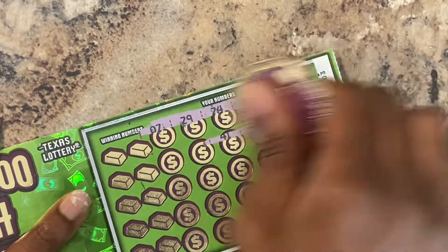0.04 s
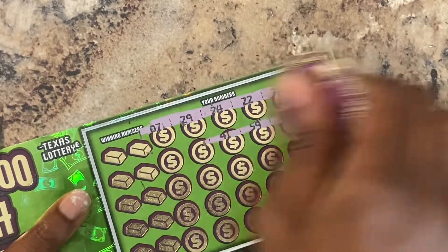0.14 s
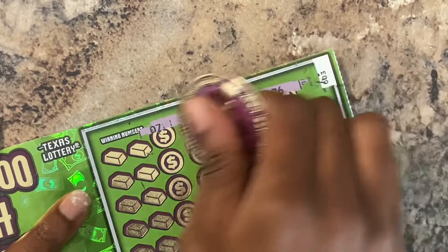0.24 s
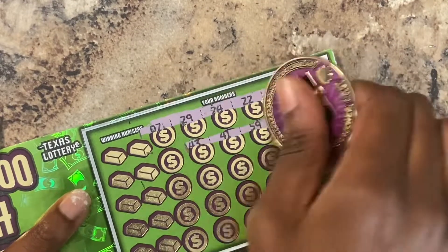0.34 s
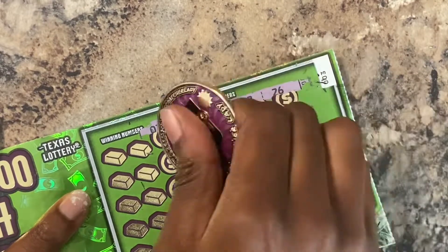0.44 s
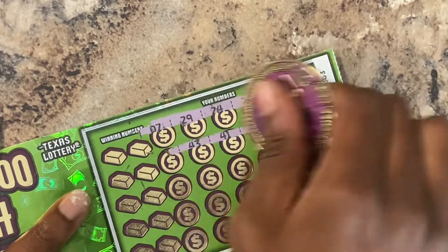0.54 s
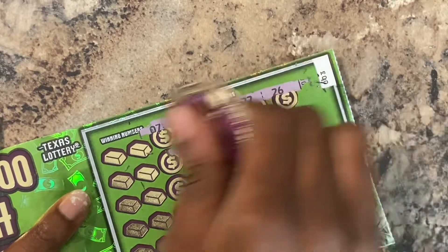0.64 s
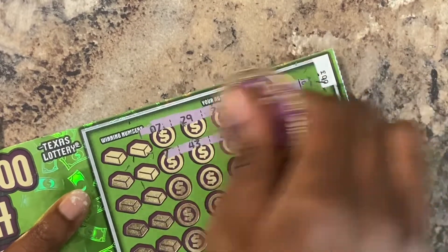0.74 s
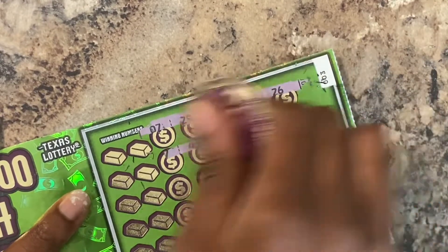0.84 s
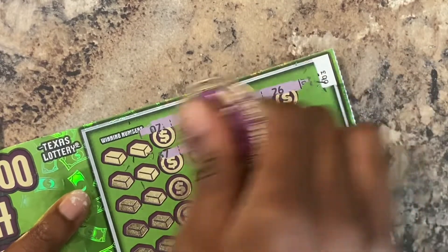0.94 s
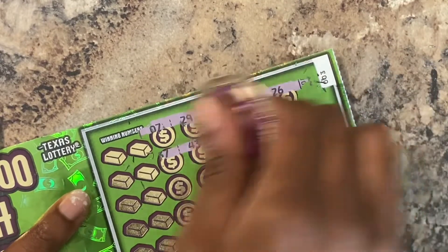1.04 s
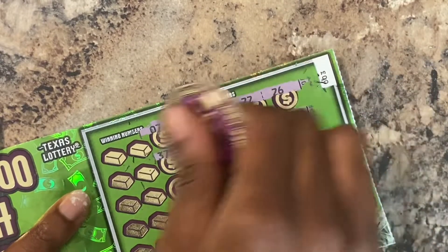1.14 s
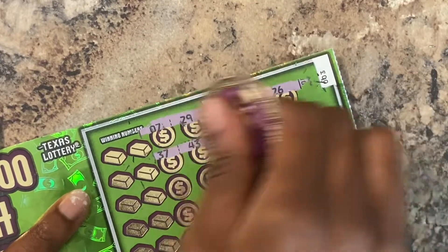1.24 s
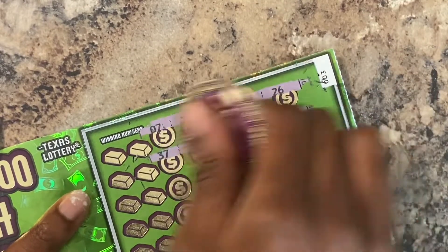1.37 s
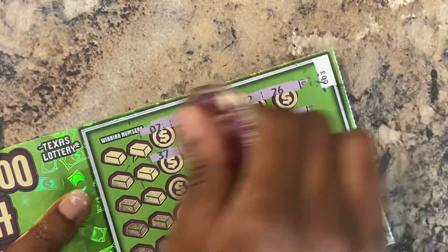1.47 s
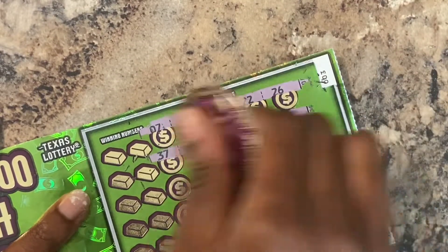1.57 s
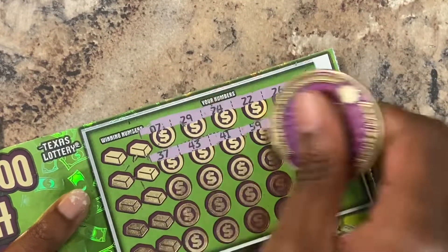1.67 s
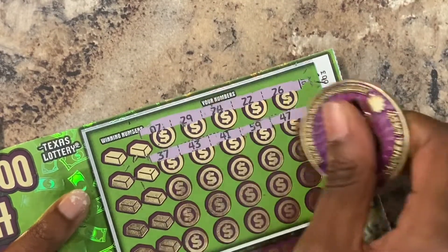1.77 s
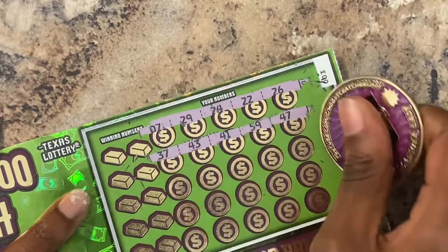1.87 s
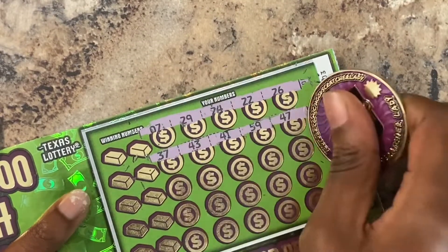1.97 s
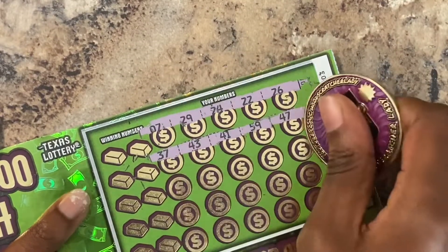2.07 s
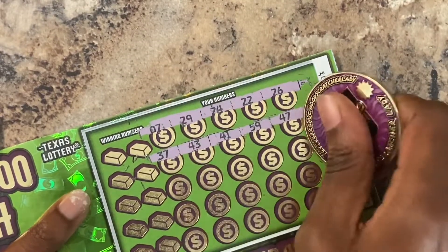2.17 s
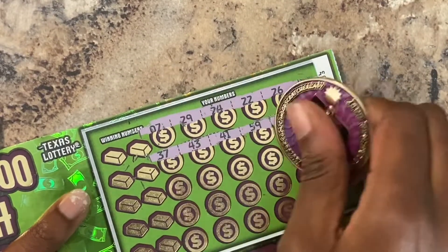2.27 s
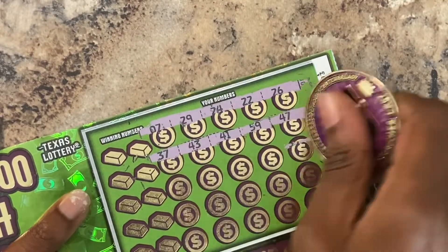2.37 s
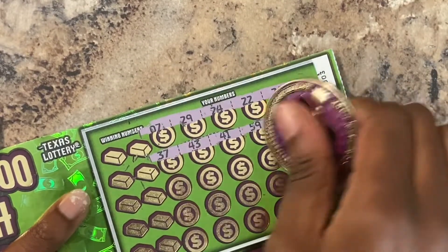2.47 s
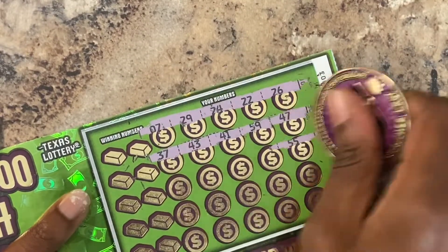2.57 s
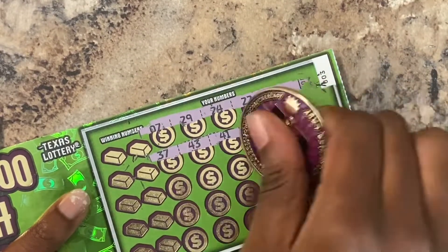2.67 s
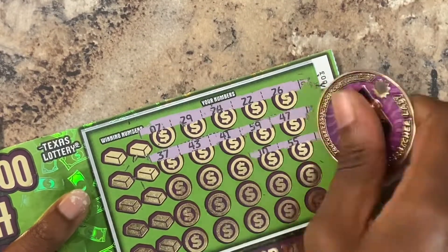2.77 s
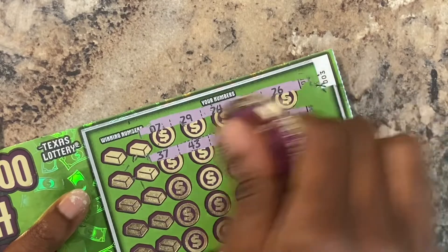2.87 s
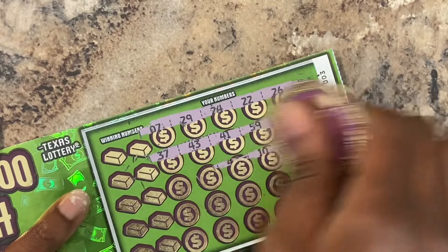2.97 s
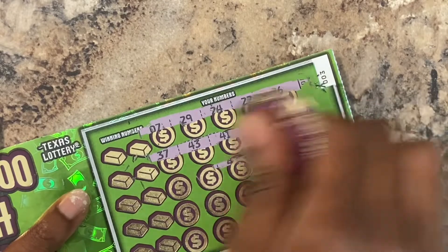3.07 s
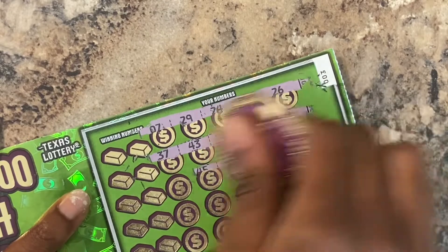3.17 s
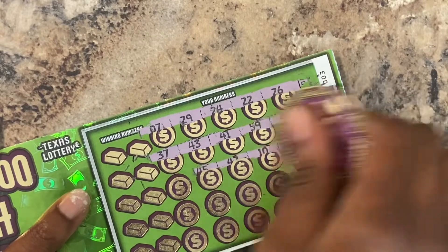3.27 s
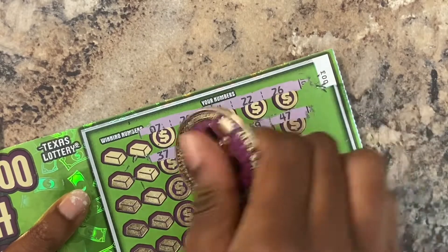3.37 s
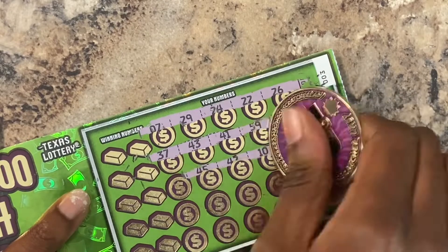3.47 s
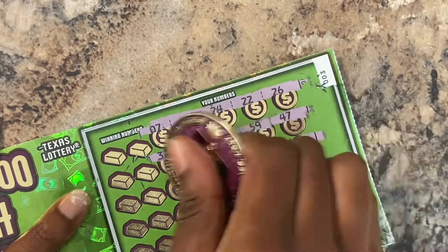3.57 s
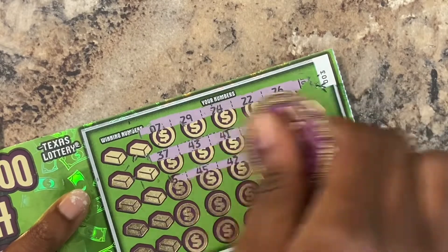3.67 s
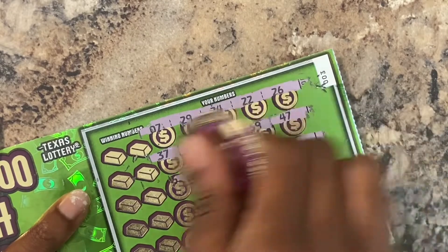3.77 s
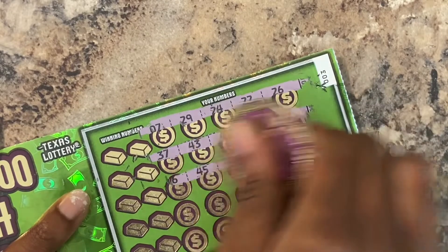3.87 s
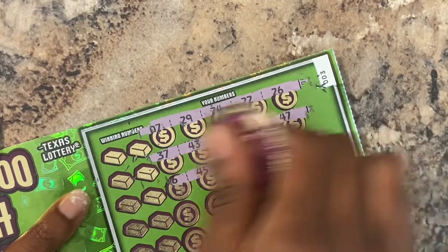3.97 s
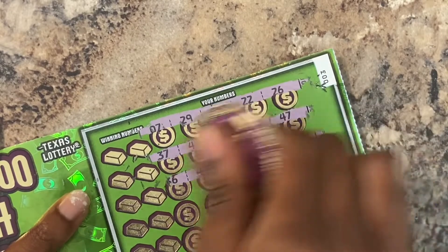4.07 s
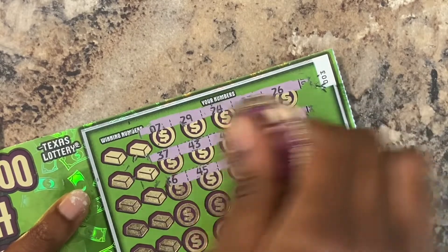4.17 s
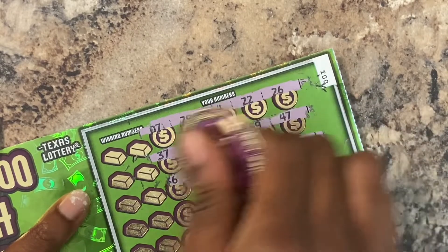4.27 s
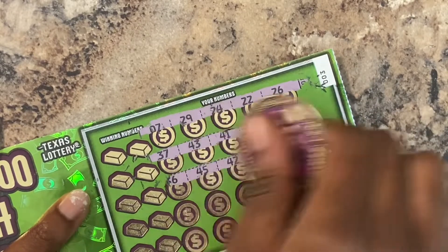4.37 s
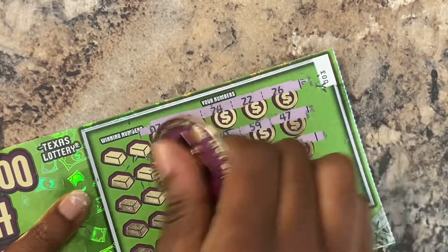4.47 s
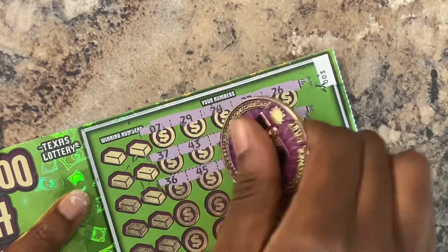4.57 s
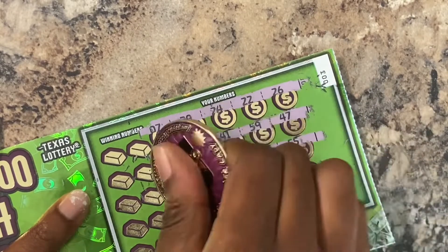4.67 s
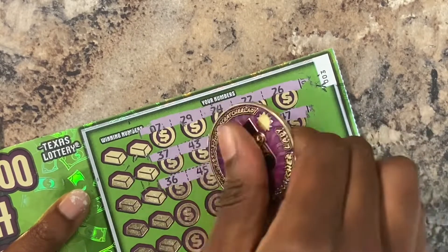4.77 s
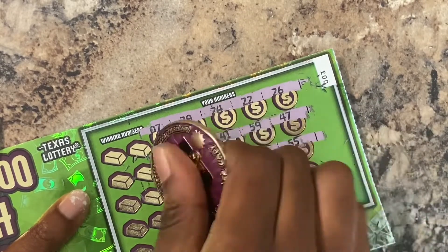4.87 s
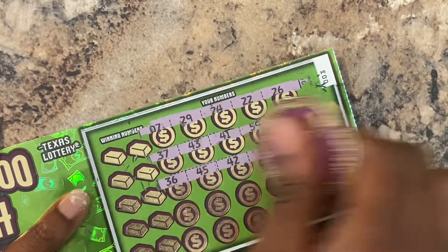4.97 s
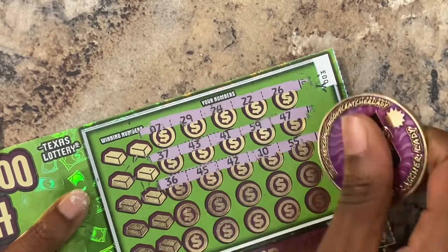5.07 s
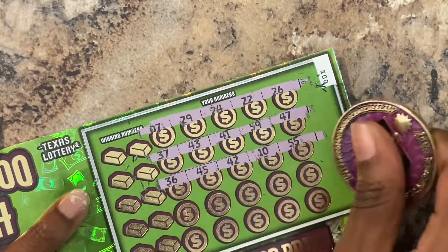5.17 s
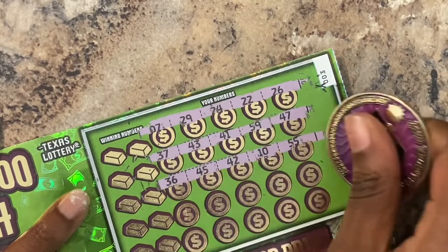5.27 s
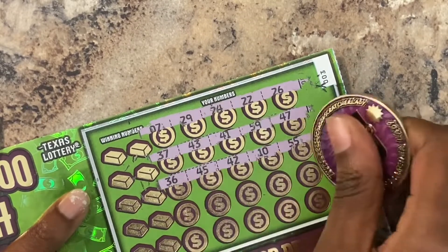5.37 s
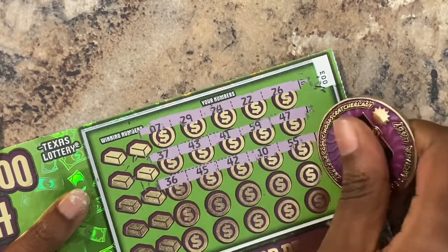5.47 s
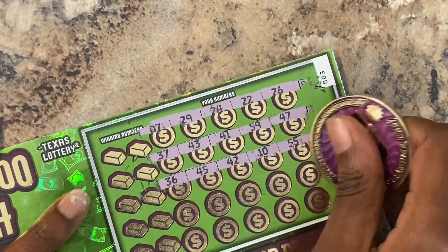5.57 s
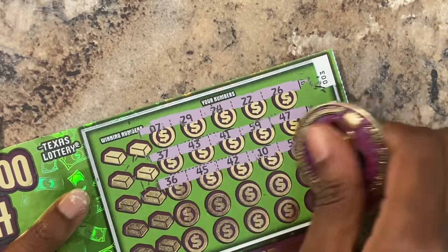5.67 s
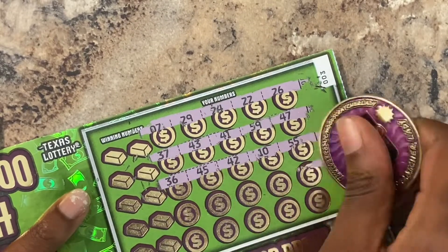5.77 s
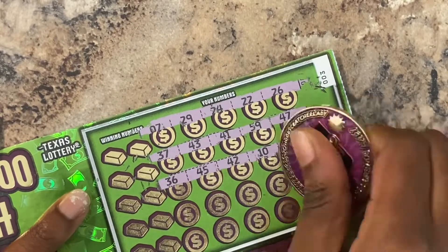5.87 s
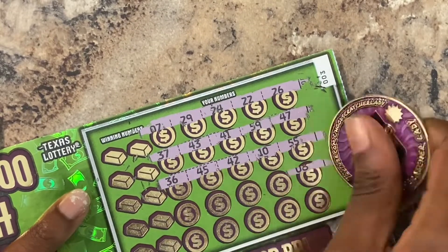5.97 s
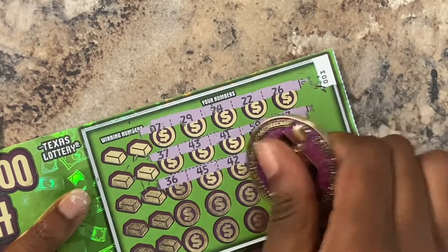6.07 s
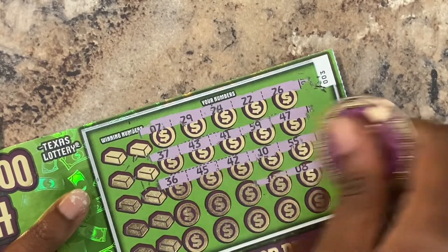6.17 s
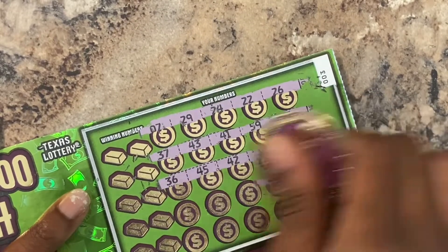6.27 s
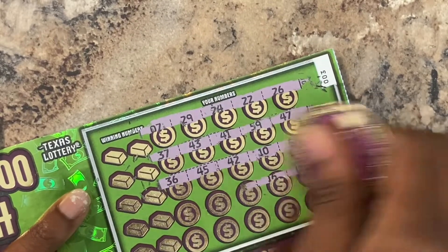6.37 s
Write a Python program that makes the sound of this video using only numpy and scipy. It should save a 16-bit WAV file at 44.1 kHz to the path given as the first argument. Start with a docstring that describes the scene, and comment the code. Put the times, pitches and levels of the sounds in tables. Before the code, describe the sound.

Close up, a large coin scratches the coating from a paper ticket on a stone countertop. About nine quick strokes a second alternate heavy and light, gritty crackle over a hollow papery thrum. Three bouts are split by short pauses with a small tap as the coin is set down. A faint low hum and quiet room noise lie beneath; close stereo microphone, little echo.

```python
"""Brisk, crackling scrapes: a large coin rubs the coating off a paper ticket on a stone countertop.
About nine strokes a second run in three bouts, heavy forward and light back. Dense tiny fractures make
the crackle; the rim's slips and catches set the pressed coin and card thrumming, and its drag over the fibres rasps.
Between bouts the coin is set down with a tap, a bending wave whose high notes arrive first.
Sine tones hum faintly over filtered room noise; two close microphone ports hear it all."""
import sys
import numpy as np
from scipy import signal
from scipy.fft import rfft, irfft, next_fast_len
from scipy.io import wavfile
from scipy.ndimage import uniform_filter1d, map_coordinates

SR = 44100
rng = np.random.default_rng(int(sys.argv[2]) if len(sys.argv) > 2 else 0)


def materialize(psi):
    """Save the field psi as 16-bit PCM at rate SR to the path in sys.argv[1].

    A 1-D psi becomes a single channel; in a 2-D psi each row is a channel.
    """
    bounded = np.clip(np.atleast_2d(psi).T, -1, 1)
    quanta = np.round(bounded * 32767).astype(np.int16)
    wavfile.write(sys.argv[1], SR, quanta)


N = 283563


def amp(db):
    """Decibels to gain."""
    return 10 ** (np.asarray(db) / 20)


def unit(x):
    """Scale to rms 1."""
    return x / np.sqrt(np.mean(x ** 2) + 1e-20)


def along(points, hz):
    """Read (f/Hz, value) points on a log frequency axis."""
    f, v = np.transpose(points)
    return np.interp(np.log(hz + 1), np.log(f + 1), v)


def wobble(rate):
    """A smooth random curve, rate knots a second."""
    return map_coordinates(rng.standard_normal(SR), [np.arange(N) * rate / SR])


def filtered(x, response):
    """Multiply the spectrum of x by a complex response of frequency."""
    size = next_fast_len(N + SR // 2)
    return irfft(rfft(x, size) * response(np.fft.rfftfreq(size, 1 / SR)), size)[..., :N]


def ring(level_db, size=4096):
    """Causal (minimum-phase) impulse response, of energy 1, with the given dB response."""
    cepstrum = irfft(np.log(amp(level_db(np.fft.rfftfreq(size, 1 / SR))) + 1e-6))
    # fold the cepstrum forward in time so that the response is causal
    cepstrum[1:size // 2] *= 2
    cepstrum[size // 2 + 1:] = 0
    response = irfft(np.exp(rfft(cepstrum)))
    return response / np.linalg.norm(response)


def through(x, response):
    """Excite an impulse response with x."""
    return signal.fftconvolve(x, response)[:N]


def add(track, s, sound):
    """Mix a sound into the track at time s, in seconds."""
    part = track[max(round(s * SR), 0):][:len(sound)]
    part += sound[:len(part)]


def slips(rate, spread_db):
    """Tiny random slips, rate a second, of uneven size and either sign, rms 1."""
    sizes = amp(spread_db * np.clip(rng.standard_normal(N), -2, 2))
    signs = np.sign(rng.standard_normal(N))
    happens = rng.random(N) < rate / SR
    return unit(sizes * signs * happens)


def patchy(x, depth_db, size=256):
    """Random gains over patches of time and frequency."""
    z = signal.stft(x, nperseg=size)[2]
    across_hz = uniform_filter1d(rng.standard_normal(z.shape), size=5, axis=0)
    field = uniform_filter1d(across_hz, size=7, axis=1)
    return signal.istft(z * amp(depth_db * unit(field)), nperseg=size)[1][:N]


# colour of the room noise: (f/Hz, relative level/dB per Hz)
ROOM_NOISE_COLOUR = [(20, -37), (45, -11), (70, 5.5), (100, 2.5), (170, -1), (330, -1.5), (450, -15.5),
                     (570, -12.5), (800, -27), (1200, -32.5), (3000, -37), (6500, -43.5), (12000, -47),
                     (16000, -62)]


def air(air_db=-57):
    """Low, steady room noise: random pressure shaped by a fixed spectrum."""
    return amp(air_db) * unit(filtered(rng.standard_normal(N), lambda hz: amp(along(ROOM_NOISE_COLOUR, hz))))


# steady tones of the room: (f/Hz, rms level/dB, wander/Hz)
HUM_TONES = [(119, -64, 0.843), (239.6, -73, 2.7), (530, -80.5, 7.4), (3780, -89.5, 25), (4500, -84, 120)]


def hum():
    """An appliance's hum and thin whine: sines whose pitch wanders slightly."""
    out = np.zeros(N)
    for hz, db, wander in HUM_TONES:
        phase = 2 * np.pi * np.cumsum(hz + wander * wobble(4 * wander)) / SR
        out += amp(db) * np.sqrt(2) * np.sin(phase)
    return out


# how long the walls ring: (f/Hz, t60/s)
WALL_DECAY = [(200, 0.37), (600, 0.47), (4000, 0.34), (15000, 0.08)]


def room(x):
    """The walls answer with a diffuse tail, each frequency dying at its own speed."""
    hz, t, z = signal.stft(rng.standard_normal(SR // 2), SR, nperseg=256)
    fade_db = -60 * t / along(WALL_DECAY, hz)[:, None]
    tail = signal.istft(z * amp(fade_db), SR, nperseg=256)[1]
    # the tail starts 5 ms late
    return through(x, np.pad(unit(tail) / np.sqrt(len(tail)), (SR // 200, 0)))


# phase by which the left port leads: (f/Hz, phase/rad)
LEFT_LEAD = [(100, 0), (430, -.6), (700, -.25), (900, -.1), (1150, .35), (1800, 0), (7500, 0), (7950, -1.4),
             (8850, -3.05), (9550, -3.25), (10500, -5.7), (11050, -6.28), (11650, -6.3), (12450, -8.7),
             (13350, -9.45), (15050, -12.57)]
# left-right likeness: (f/Hz, correlation 0-1)
LIKENESS = [(100, .97), (600, .98), (1000, .88), (2000, .95), (2600, .995), (7400, .98), (7750, .65),
            (9100, .99), (9950, .65), (11200, .98), (12200, .6), (13200, .99), (14300, .8), (15500, .97)]
# left minus right: (f/Hz, level/dB)
LEFT_EXCESS = [(700, 0), (1000, -4), (1400, -4), (1800, 0)]


def ports(common, differing):
    """Two ports share one sound, offset in phase and level, plus a part of opposite sign in each."""
    sides = np.array([[1], [-1]])  # left, right

    def turn(hz):
        return np.arccos(np.clip(along(LIKENESS, hz), 0, 1)) / 2

    def offset(hz):
        level = amp(.5 * sides * along(LEFT_EXCESS, hz))
        return level * np.exp(.5j * sides * along(LEFT_LEAD, hz))

    shared = filtered(common, lambda hz: np.cos(turn(hz)))
    opposed = sides * filtered(differing, lambda hz: np.sin(turn(hz)))
    return filtered(shared + opposed, offset)


# the rim grazes the card as it leaves and before it lands: (start t/s, length/s, level/dB)
GRAZES = [(1.555, .1, -75), (4.905, .08, -77), (5.36, 0.12, -73)]


def brush(fade_s=0.02):
    """A faint hiss as the rim grazes the card: noise in a broad hump around 6.5 kHz."""
    t = np.arange(N) / SR
    gain = np.zeros(N)
    for s, length, db in GRAZES:
        to_edge = np.minimum(t - s, s + length - t)
        gain += amp(db) * np.clip(to_edge / fade_s, 0, 1)
    hiss = filtered(rng.standard_normal(N), lambda hz: np.exp(-((hz - 6500) / 4000) ** 2))
    return gain * unit(hiss)


# light ticks of the rim as it lifts or touches: (t/s, relative level/dB)
RIM_TICKS = [(1.546, -28), (2.006, -43), (2.027, -43), (2.031, -39), (4.886, -26.5), (5.354, -43)]


def ticks(t60=0.0083, tick_db=-7, dull_share=0.28):
    """Short clicks of the rim: dying noise, coloured between its scrape and its bite."""
    t = np.arange(SR // 20) / SR
    out = np.zeros(N)
    for s, db in RIM_TICKS:
        add(out, s, amp(db + tick_db - 60 * t / t60) * rng.standard_normal(len(t)))

    def colour(hz):
        return (1 - dull_share) * along(COATING_COLOUR, hz) + dull_share * along(BITE_COLOUR, hz)

    return through(out, ring(colour))


# the coin is set down: (t/s, knock level/dB)
SET_DOWNS = [(2.026, -22.5), (5.445, -27.5)]


def taps(body_share=0.52, dull_hz=900, lead_s=0.0041, settle_db=-22, settle_t60=0.044, size=4096):
    """A tap spreads as a bending wave, high notes first; the card then settles under the coin."""
    hz = np.fft.rfftfreq(size, 1 / SR)
    # the delay is 12 ms at 550 Hz and falls with the root of frequency
    phase = 4 * np.pi * .012 * np.sqrt(550 * hz)
    body = amp(body_share * along(HEAVY_THRUM, hz)) / (1 + (hz / dull_hz) ** 4)
    knock = irfft(body * np.exp(-1j * phase))
    settle_fade = amp(settle_db - 60 * np.arange(size) / SR / settle_t60)
    settling = settle_fade * rng.standard_normal(size)
    settled = np.convolve(settling, knock / np.linalg.norm(knock))[:size]
    thud = knock / np.abs(knock).max() + settled
    out = np.zeros(N)
    for s, db in SET_DOWNS:
        add(out, s - lead_s, amp(db) * thud)
    return out


# strokes, alternately back and forth, beginning with a back stroke:
# (start t/s, force as relative thrum level/dB, scrape level/dB, rise of the scrape along the stroke/dB)
STROKE_PLAN = [(-0.03, -29, -47, 12), (0.086, -23, -41, 9), (0.211, -34, -48, -1), (0.32, -23, -44.5, -1),
               (0.434, -33, -48, -3.5), (0.542, -26.5, -46, 6), (0.663, -29, -48.5, 1),
               (0.769, -26, -46.5, -4), (0.881, -31.5, -55, 2), (0.987, -29, -49, 0),
               (1.093, -33, -50.5, 3), (1.198, -27, -55.5, -2), (1.304, -31.5, -51, 8),
               (1.412, -31.0, -52, -6), (1.523, -41.5, -49, 2), (2.164, -37, -59.5, -11),
               (2.255, -35, -47.5, -1), (2.348, -33, -39.5, -0.5), (2.449, -33.5, -43.5, 9),
               (2.549, -26.5, -42, 0), (2.667, -30.5, -44.5, 7.5), (2.77, -23, -43, 2.5),
               (2.897, -29, -48.5, -11), (3.003, -23.5, -40.5, 1), (3.119, -29.0, -46.5, 2),
               (3.235, -24, -42.5, -6.5), (3.356, -27.5, -45.5, 1.5), (3.461, -26.5, -40.5, -5),
               (3.578, -30, -51.5, -7), (3.687, -25, -44.5, -5.5), (3.797, -33.5, -44, 1.5),
               (3.907, -23, -48.5, 9.5), (4.016, -28, -50.5, -2), (4.125, -27, -49.5, -4),
               (4.237, -27, -54, 4), (4.344, -23, -49, 21), (4.453, -31.5, -49.5, -6),
               (4.561, -27, -52.5, 11), (4.669, -33, -51, -3.5), (4.774, -28.5, -53, -7),
               (4.872, -43.5, -52, -4), (5.484, -46, -56.5, 0), (5.547, -41, -58.5, -9),
               (5.604, -38, -44.5, -6), (5.696, -36.5, -44.5, -1.5), (5.78, -34.0, -40.5, 6.5),
               (5.873, -34, -45.5, 1.5), (5.969, -27.0, -41.5, 0.5), (6.084, -31.5, -45.5, -8.5),
               (6.196, -23.5, -42, 4.5), (6.304, -29, -45.5, 0.5), (6.416, -26, -50, -9)]
# the coin leaves the card, which ends the stroke under way: (t/s)
COIN_LIFTS = [1.565, 4.914, 5.525, 5.581, 6.5]
# the light back stroke bites at once and then skims; turn_s: rest at its end/s,
# hardest: place of most pressure 0-1, swell: how peaked the pressure is, rasp_db: level over the force/dB,
# wear_db: scrape early, midway and late/dB, polish: dB more treble for each dB of wear
BACK_STROKE = dict(turn_s=0.00799, hardest=.62, swell=1.25, rasp_db=-15, wear_db=[3.5, -2, -3.5], polish=0)
# the heavy forward stroke scrapes all the way; same keys and units
FORWARD_STROKE = dict(turn_s=.014, hardest=.49, swell=1.11, rasp_db=-18, wear_db=[2, 1.5, -0.5],
                  polish=0.35)


def passes():
    """(start, end, force dB, scrape dB, rise dB, manner) of each stroke, until the coin turns or lifts."""
    following = [row[0] for row in STROKE_PLAN[1:]] + [np.inf]
    rows = []
    for k, ((start, *levels), next_start) in enumerate(zip(STROKE_PLAN, following)):
        manner = FORWARD_STROKE if k % 2 else BACK_STROKE
        later_lifts = [s for s in COIN_LIFTS if s > start]
        end = min([next_start - manner["turn_s"]] + later_lifts)
        rows.append((start, end, *levels, manner))
    return rows


# the rim gouges out a thick patch of coating with a short zip: (start t/s, relative level/dB)
GOUGE_ZIPS = [(1.053, -40.5), (1.27, -46), (2.172, -41.5), (2.608, -30.5), (3.492, -42), (4.412, -41),
              (4.628, -41), (6.245, -33)]
GOUGE_ATTACK_S, GOUGE_DECAY_S = 0.0028, 0.0081
# treble of the scrape, dull as the second and third bouts begin: (t/s, level/dB)
SCRAPE_TREBLE = [(0, -0.5), (.5, -2.5), (.9, -1), (1.4, 0), (2.2, -9), (2.5, -3.5), (3.0, 0.5),
                 (3.65, -1.5), (4.15, 0.5), (4.3, -6), (4.85, -5.5), (5.55, -10), (6.1, -1)]
# excess of force over scrape (dB) above which forward strokes, on coating worn thin, hiss; below it, dull
WORN_DB = 24
# below this force the rim hardly reaches the fibres of the card (dB)
FIBRE_DB = -40.5


def strokes(edge=0.22, rasp_swell=1.0, bite_place=0.18, bite_width=0.19):
    """Gains of thrum, rasp, scrape, bite and treble: the coin speeds up, bears down, and stops to turn."""
    t = np.arange(N) / SR
    thrum, rasp, scrape, bite = np.zeros((4, N))
    colours = []
    for start, end, force_db, scrape_db, rise_db, manner in passes():
        now = (t > start) & (t < end)
        way = (t[now] - start) / (end - start)  # 0 to 1 along the stroke
        pressure = np.sin(np.pi * np.interp(way, [0, manner["hardest"], 1], [0, .5, 1]))
        to_edge = np.minimum(way, 1 - way) / edge
        sliding = np.sin(np.pi / 2 * np.clip(to_edge, 0, 1)) ** 2
        reach = 1 / (1 + amp(FIBRE_DB - force_db) ** 4)
        wear_points = manner["wear_db"] + rise_db * np.array([-.5, 0, .5])
        wear_db = np.interp(way, [.15, .5, .85], wear_points)
        thrum[now] += amp(force_db) * pressure ** manner["swell"]
        rasp[now] += reach * amp(force_db + manner["rasp_db"]) * np.sin(np.pi * way) ** rasp_swell
        scrape[now] += amp(scrape_db + wear_db) * sliding
        bite[now] += np.exp(-((way - bite_place) / bite_width) ** 2)
        worn_db = force_db - scrape_db - WORN_DB
        colours.append(((start + end) / 2, manner["polish"] * worn_db))
    for s, db in GOUGE_ZIPS:
        age = t[t > s] - s
        attack = np.minimum(age / GOUGE_ATTACK_S, 1)
        scrape[t > s] += amp(db) * attack * np.exp(-np.minimum(age / GOUGE_DECAY_S, 20))
    treble_db = np.interp(t, *np.transpose(SCRAPE_TREBLE)) + np.interp(t, *np.transpose(colours))
    return thrum, rasp, scrape, bite, amp(treble_db)


# colour of the card's fibres: (f/Hz, relative level/dB per Hz)
FIBRE_COLOUR = [(100, -27.5), (500, -12.5), (900, 2.5), (1300, 2.5), (1650, -1), (1950, -14), (2200, -8),
                (2450, -17.5), (2800, -10.5), (4000, -28.5), (8000, -81)]


def paper(gain, rasp_db=-1.0, patchy_db=2):
    """The rim drags over the fibres of the card: dense slips ring a papery resonance."""
    drag = gain * slips(rate=2500, spread_db=0.5)
    fibres = through(drag, ring(lambda hz: along(FIBRE_COLOUR, hz)))
    return amp(rasp_db) * patchy(fibres, patchy_db)


def steady_thrum(spectrum, evenness, drift=.045, size=300):
    """Slips ring a resonance of wavering pitch; its loudness swells are partly evened out."""
    x = unit(through(slips(rate=1200, spread_db=3), ring(lambda hz: along(spectrum, hz))))
    # uneven playback speed shifts the pitch
    x = map_coordinates(x, [np.cumsum(1 + drift * wobble(18))], mode="mirror")
    power = np.abs(uniform_filter1d(uniform_filter1d(x ** 2, size), size)) + 1e-6
    return unit(x / power ** (evenness / 2))


# the hardest catches of the rim: (t/s, peak level/dB)
HARD_CATCHES = [(0.128, -12), (0.365, -17), (0.049, -23), (0.714, -21), (1.024, -17.5), (1.232, -26.5),
                (2.602, -19.5), (2.716, -24), (2.819, -16), (3.032, -13), (3.074, -16.5), (3.291, -16.5),
                (3.313, -15), (3.533, -15.5), (3.744, -17), (3.965, -13.5), (4.296, -17), (4.4, -14),
                (4.825, -25.5), (6.026, -17.5), (6.222, -18), (6.365, -18)]
# light catches: level over the force (dB), its scatter (dB), scatter in time (s)
SNAG_DB, SNAG_SPREAD_DB, SNAG_SPREAD_S = 7, 1.5, .012


def snags():
    """(s, dB) of a light catch in each stroke that has no hard one, about where the hand presses most."""
    chance = rng.standard_normal((len(STROKE_PLAN), 2))
    light = []
    for (start, end, force_db, *_, manner), (late, loud) in zip(passes(), chance):
        if any(start < s < end for s, _ in HARD_CATCHES):
            continue
        s = start + manner["hardest"] * (end - start) + SNAG_SPREAD_S * late
        light.append((s, force_db + SNAG_DB + SNAG_SPREAD_DB * loud))
    return light


# the thrum under a heavy hand: (f/Hz, relative level/dB per Hz)
HEAVY_THRUM = [(100, -37), (200, -34), (270, -27), (350, -16.5), (410, -14.5), (480, -4.5), (550, 2.5),
               (630, -2.5), (730, -10.5), (820, -17), (920, -36.5), (1300, -43), (2500, -78)]
# the thrum under a light hand sits higher: (f/Hz, relative level/dB per Hz)
LIGHT_HAND_THRUM = [(100, -54.5), (200, -31.5), (330, -21), (420, -13.5), (500, -5.5), (590, 1), (670, 1.5),
                    (750, -1), (830, -13.5), (930, -29), (1300, -23), (2500, -96.5)]


def card(gain, thrum_db=-2.0, heavy_db=-29, evenness=0.47, catch_db=0, catch_lead_s=0.003083,
         stick_depth=0.29, stick_lead_s=0.0089, stick_width_s=0.0022, knock_db=-22, knock_hz=290):
    """Slips and catches of the rim drive the low resonance of coin and card, which deepens under pressure."""
    heavy = gain ** 2 / (gain ** 2 + amp(heavy_db) ** 2)
    heavy_part = np.sqrt(heavy) * steady_thrum(HEAVY_THRUM, evenness)
    light_part = np.sqrt(1 - heavy) * steady_thrum(LIGHT_HAND_THRUM, evenness)
    t = np.arange(N) / SR
    jolts, free = np.zeros(N), np.ones(N)
    for s, db in HARD_CATCHES + snags():
        # the rim sticks for a moment, then lets go
        near = slice(*np.searchsorted(t, [s - .05, s + .05]))
        free[near] *= 1 - stick_depth * np.exp(-((t[near] - s + stick_lead_s) / stick_width_s) ** 2)
        add(jolts, s - catch_lead_s, [amp(db + catch_db)])
    # the release builds up over a few cycles and also knocks the card against the stone
    jolt = ring(lambda hz: 1.37 * along(HEAVY_THRUM, hz))
    knock = amp(knock_db) * ring(lambda hz: -20 * np.log10(1 + ((hz - knock_hz) / 90) ** 2))
    catches = through(jolts, (jolt + knock) / np.abs(jolt).max())
    return amp(thrum_db) * gain * free * (heavy_part + light_part) + catches


# colour of the crackle: (f/Hz, relative level/dB per Hz)
COATING_COLOUR = [(500, -23), (2000, -19), (2450, -17.5), (2850, -7.5), (3200, -12), (3480, -10),
                  (3750, -1.5), (4350, -2.5), (4950, 0.5), (5550, -6.5), (5950, -2.5), (7200, -11),
                  (9800, -11), (11100, -7.5), (12600, -12.5), (15800, -15.5)]
# the rim's first bite into the coating: (f/Hz, relative level/dB per Hz)
BITE_COLOUR = [(500, -20), (3200, -37.5), (4000, -4.5), (4650, 0.5), (5300, -6), (6500, -20), (9000, -26),
               (16000, -49)]
# bright resonances of the scrape: (f/Hz, width/Hz, boost/dB)
SHEEN_PEAKS = [(3790, 107, 7.5), (8430, 410, 10.5), (13890, 940, 13.5), (14570, 350, 17)]


def coating(gain, bite, treble, scrape_db=0, bite_db=-3, bite_share=0.4, uneven_db=2.5, patchy_db=3.5,
            tilt_db=3.5, split_hz=7000, linger_db=-20, size=2600):
    """The coating crumbles in dense tiny fractures, brighter or duller as the rim's angle shifts."""
    def colour(hz):
        peaks = sum(db / (1 + (2 * (hz - centre) / width) ** 2) for centre, width, db in SHEEN_PEAKS)
        return along(COATING_COLOUR, hz) + peaks

    # loose crumbs keep grinding under the rim while the coin turns
    crumbs = amp(linger_db) * uniform_filter1d(gain, size)
    grind = gain * (1 - bite_share * bite) + crumbs
    fractures = unit(slips(rate=7000, spread_db=6.0) * amp(uneven_db * wobble(220)))
    crackle = through(grind * fractures, ring(colour))
    # while the coin is still slow its scrape is narrower, almost a chirp
    bite_slips = gain * bite * slips(rate=3000, spread_db=1)
    biting = through(bite_slips, ring(lambda hz: along(BITE_COLOUR, hz)))
    dull = filtered(crackle, lambda hz: 1 / (1 + (hz / split_hz) ** 6))
    bright = (crackle - dull) * treble * amp(tilt_db * wobble(35))
    return patchy(amp(scrape_db) * (dull + bright) + amp(bite_db) * biting, patchy_db)


def scene(low_wet_db=-17, high_wet_db=-18):
    """The coin close up, the room faint behind it."""
    thrum, rasp, scrape, bite, treble = strokes()
    low = card(thrum) + paper(rasp) + taps()
    high = coating(scrape, bite, treble) + ticks() + brush()
    sent = amp(low_wet_db) * low + amp(high_wet_db) * high
    common = low + high + room(sent) + air() + hum()
    # scattered scrape, echoes and room noise reach each port a little differently: fresh random draws
    differing = paper(rasp) + coating(scrape, bite, treble) + room(sent) + air()
    return ports(common, differing)


TOP_HZ = 15830


def record(dry):
    """The recorder keeps nothing above its band limit."""
    return filtered(dry, lambda hz: hz < TOP_HZ)


dry = scene()
out = record(dry)
materialize(out)
```